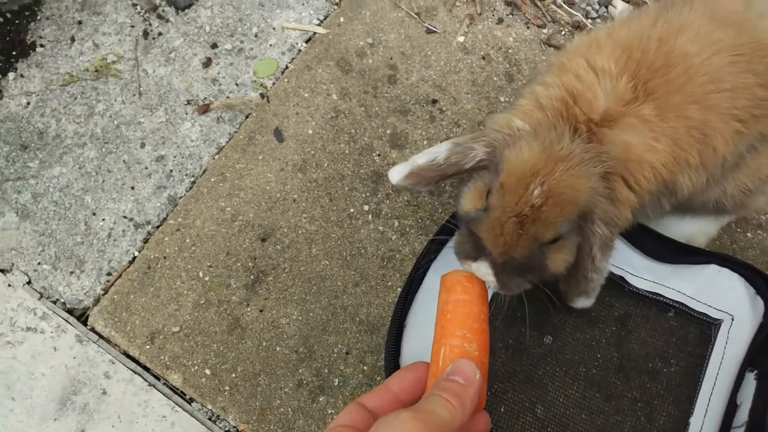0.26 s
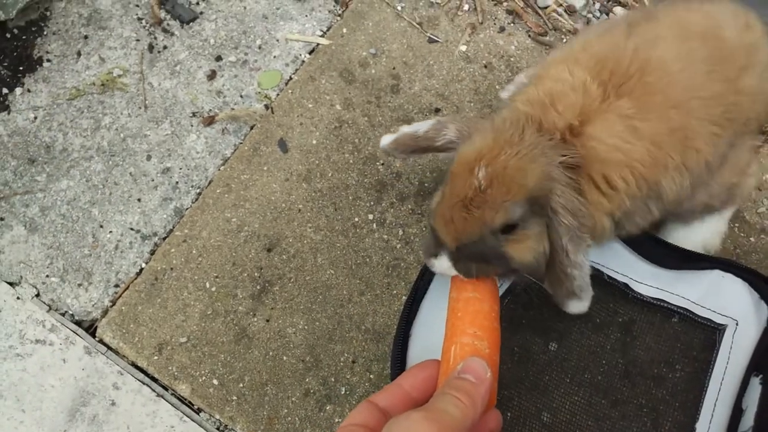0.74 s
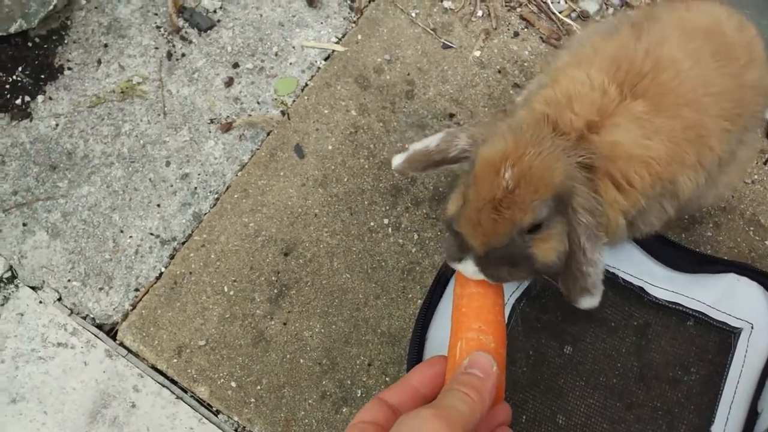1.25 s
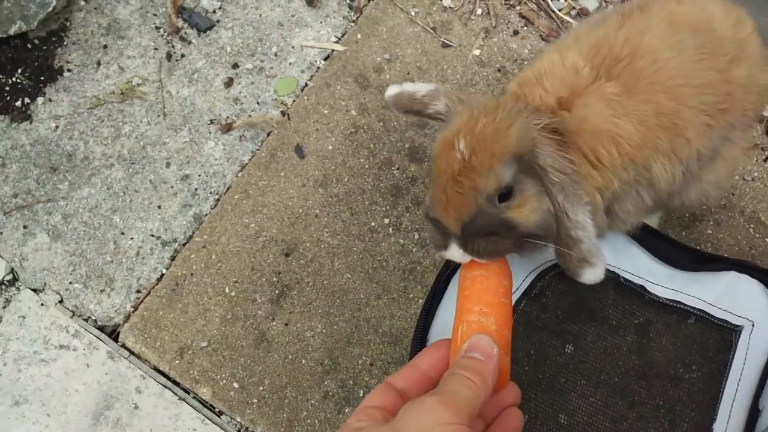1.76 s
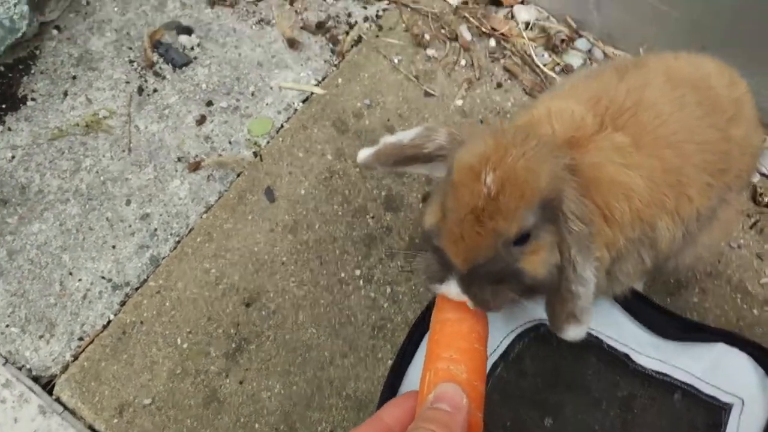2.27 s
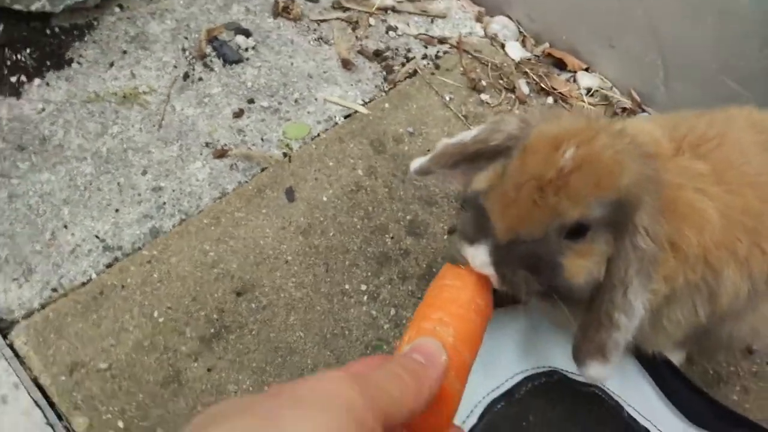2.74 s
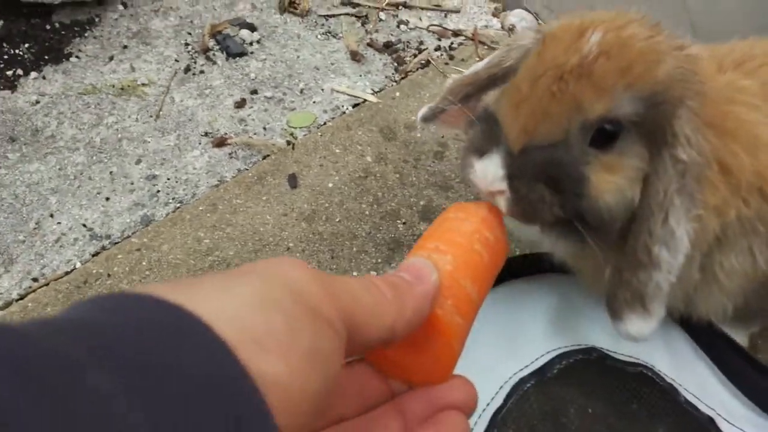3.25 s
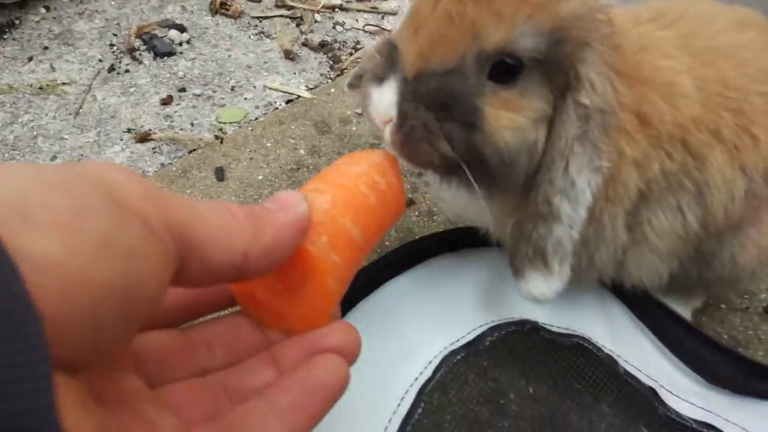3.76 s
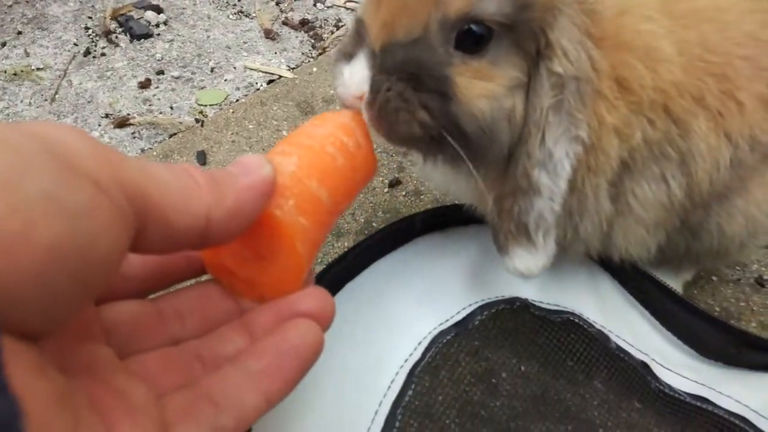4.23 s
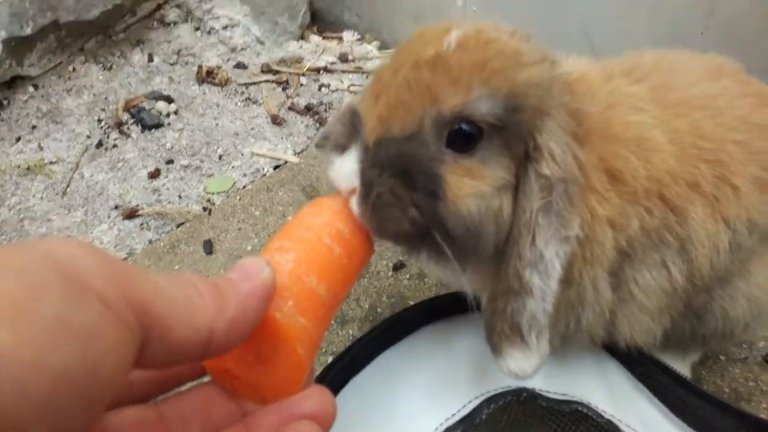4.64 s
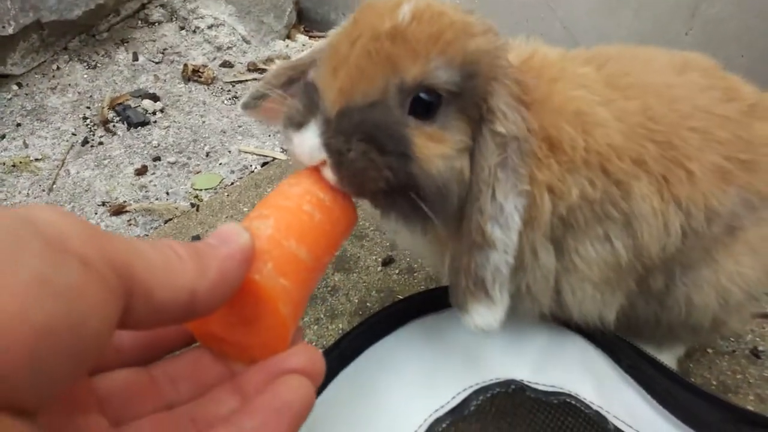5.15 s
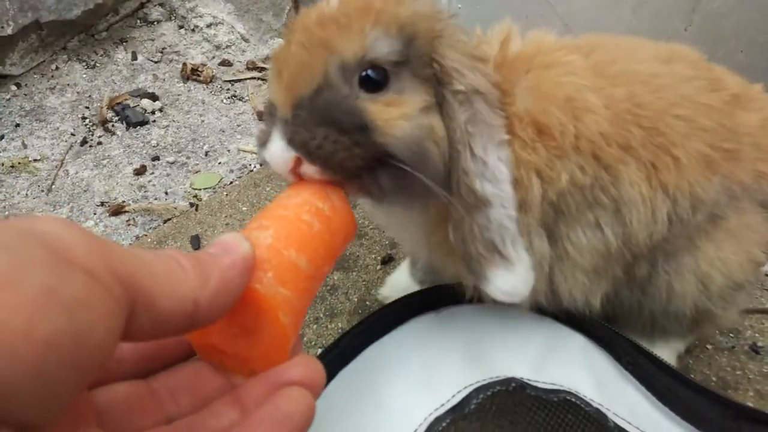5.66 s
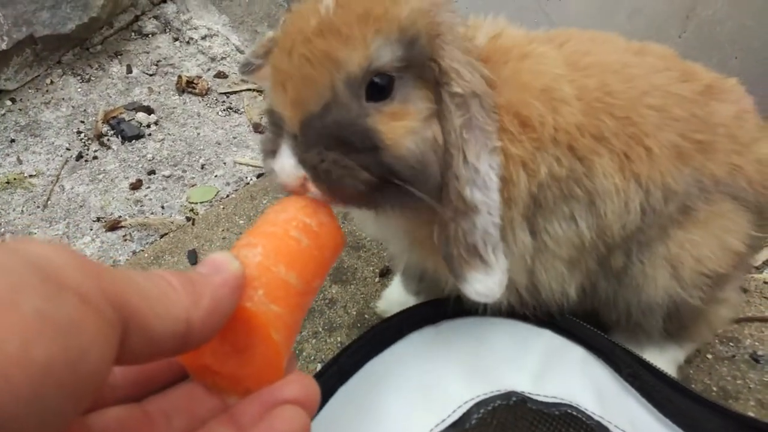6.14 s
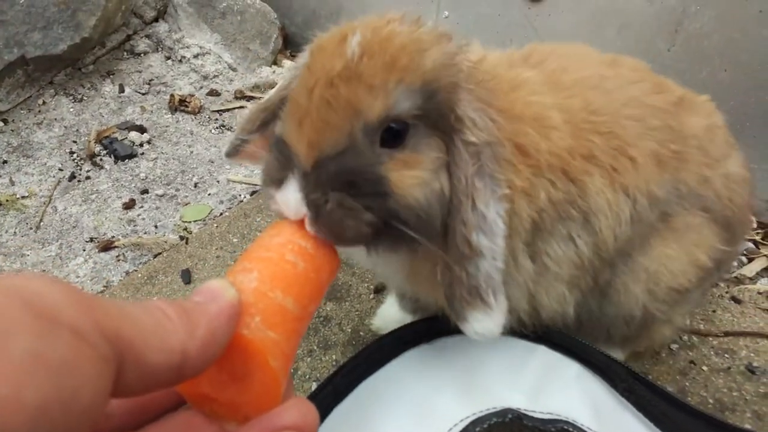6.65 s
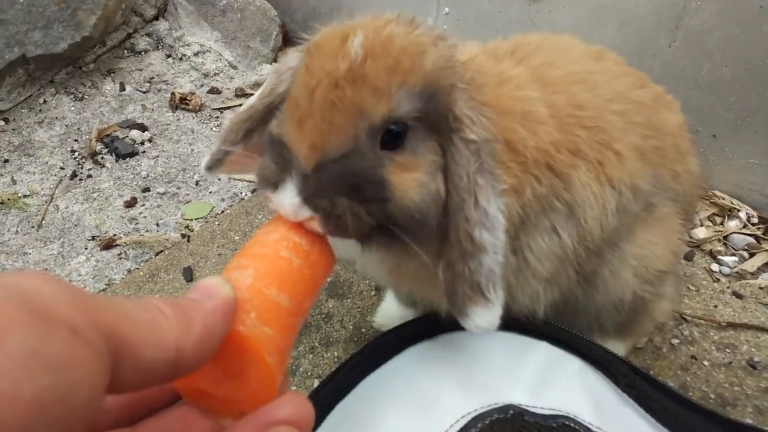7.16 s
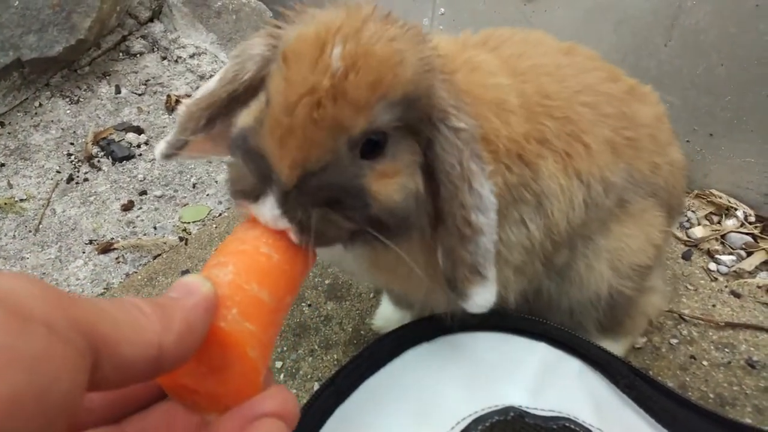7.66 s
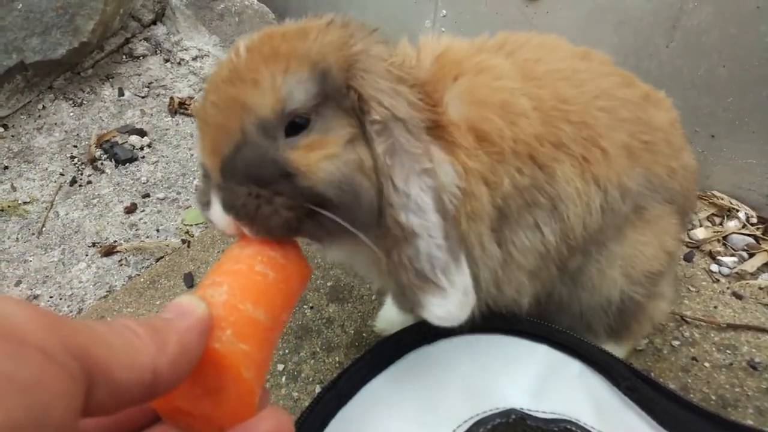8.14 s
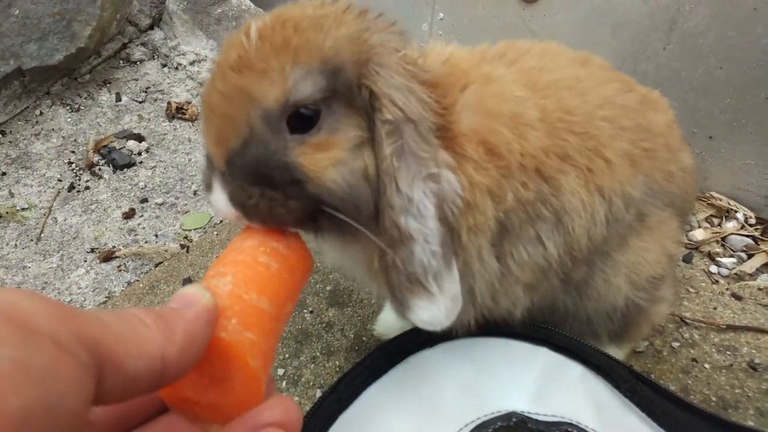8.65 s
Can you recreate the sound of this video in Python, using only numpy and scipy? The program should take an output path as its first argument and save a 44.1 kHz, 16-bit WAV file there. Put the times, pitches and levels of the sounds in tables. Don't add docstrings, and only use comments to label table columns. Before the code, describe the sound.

Quick dry gnawing and snapping carrot fibres over faint far traffic, interrupted by cloth rustle and loud stuttering handling rubs, thumps and pops on the left.

```python
import sys
import numpy as np
from scipy import signal
from scipy.io import wavfile
from scipy.ndimage import uniform_filter1d, minimum_filter1d

SR = 44100
rng = np.random.default_rng(int(sys.argv[2]) if len(sys.argv) > 2 else 0)


def volts_from_db(level):
    exponent = np.asarray(level, float) / 20
    return 10 ** exponent


def output_pcm(signal):
    pcm = np.clip(np.atleast_2d(signal).T, -1, 1) * 32767
    wavfile.write(sys.argv[1], SR, np.round(pcm).astype(np.int16))


N = 392490


def evened(x):
    return x / np.sqrt(np.mean(x ** 2) + 1e-20)


def read(points, hz):
    f, value = np.transpose(points)
    return np.interp(np.log(hz + 1), np.log(f + 1), value)


def along(rows, column, silent=-150):
    rows = np.array(rows)
    return np.interp(np.arange(N) / SR, rows[:, 0], rows[:, column], silent, silent)


def colour(x, db):
    mirrored = np.r_[db, db[-2:0:-1]]
    log_gain = np.log(volts_from_db(np.maximum(mirrored, -100)))
    taps = np.fft.ifft(np.exp(np.conj(signal.hilbert(log_gain)))).real
    return signal.oaconvolve(x, taps[:len(db)])[:len(x)]


def shaped(x, points):
    return colour(x, read(points, np.fft.rfftfreq(4096, 1 / SR)))


def passed(x, order, hz, kind):
    return signal.sosfilt(signal.butter(order, hz, kind, fs=SR, output="sos"), x)


def grains(per_s, spread_db):
    size = volts_from_db(spread_db * np.minimum(rng.exponential(1, N), 4))
    sign = rng.choice([-1., 1.], N)
    return evened(size * sign * (rng.random(N) < per_s / SR))


def clumps(depth_db, size):
    drift = uniform_filter1d(uniform_filter1d(rng.standard_normal(N), size), size)
    return evened(volts_from_db(depth_db * evened(drift)))


def bursts(rows, t60, rise=0.00049):
    out, t = np.zeros(N + 4000), np.arange(4000) / SR
    for s, db in rows:
        out[round(s * SR):][:4000] += volts_from_db(db - 60 * t / t60) * np.minimum(t / rise, 1)
    return out[:N]


def stretch(s, length, shape_db):
    out, t = np.zeros(N), np.arange(0, length, 1 / SR)
    out[round(s * SR):][:len(t)] = volts_from_db(shape_db(t))
    return out


# frequency in Hz, level in dB per Hz.
HUM_COLOUR = [(25, -41), (85, -28), (130, -20.5), (190, -3), (304, -5.5), (854, -14.5), (1120, -18),
              (2900, -23), (3810, -24.5), (6730, -24.5), (8600, -33), (16500, -40.5)]
HUM_DB = -64
# time in seconds, level in dB.
HUM_SWELL = [(0, 1), (1, 1), (2.4, 0.4), (3.2, 3.5), (4.1, 2), (6, 1.5), (8.9, 1)]
# frequency in Hz, likeness from -1 to 1.
LIKENESS = [(60, 0.31), (180, 1), (550, 0.67), (1650, -0.08), (4970, -0.022), (15000, -0.22)]
# frequency in Hz, level in dB.
HUM_RIGHT = [(100, 1), (640, 2), (2000, 0), (7000, -7), (15000, -2)]


def hum():
    frames, hz = N // 256 + 5, np.fft.rfftfreq(1024, 1 / SR)
    a, b, c, d, patches = rng.standard_normal((frames, 513, 5)).T
    patches_db = evened(uniform_filter1d(uniform_filter1d(patches, size=10, axis=0), size=12, axis=1))
    s, db = np.transpose(HUM_SWELL)
    swell_db = np.interp(np.arange(frames) * 256 / SR, s, db - db[0])
    swell_db = swell_db / (1 + (hz[:, None] / 1200) ** 2)
    same = np.clip(read(LIKENESS, hz), -1, 1)[:, None]
    left, other = a + 1j * b, c + 1j * d
    right = (same * left + np.sqrt(1 - same ** 2) * other) * volts_from_db(read(HUM_RIGHT, hz))[:, None]
    spectra = np.array([left, right]) * volts_from_db(read(HUM_COLOUR, hz)[:, None] + patches_db + swell_db)
    return volts_from_db(HUM_DB) * evened(signal.istft(spectra, nperseg=1024, noverlap=768)[1][:, :N])


# frequency in Hz, level in dB.
SELF_NOISE = [(150, -45), (1000, -10.5), (4000, -4.5), (10000, -1), (16500, 1)]
SELF_DB = -73


def self_noise():
    return np.array([volts_from_db(SELF_DB) * evened(shaped(rng.standard_normal(N), SELF_NOISE)) for port in range(2)])


# time in seconds, cover of the left port from 0 to 1, left-right balance of the rabbit in dB.
GRIP = [
    (0, 0, -16),
    (1.0, 0, 10),
    (2.4, 0, 2),
    (3.1, 0.1, 15),
    (3.8, 1, 3),
    (8.9, 1, 19),
]
# frequency in Hz, width in Hz, boost in dB.
OPEN_PORT = [(2660, 680, 7.5), (7800, 1800, 9.5)]
COVERED_PORT = [(2524, 220, 7.6), (3780, 570, 12.55), (4298, 740, 11.8), (7170, 1100, 9.4),
                (8880, 450, 9.3), (14900, 3400, 11.2)]


def left_port(x, depth, hiss_db=0):
    hz = np.fft.rfftfreq(512, 1 / SR)
    open_db, covered_db = [sum(db / (1 + (2 * (hz - f) / width) ** 2) for f, width, db in port)
                           for port in (OPEN_PORT, COVERED_PORT)]
    cover = np.clip(along(GRIP, 1), 0, 1)
    free_db = depth * open_db + hiss_db / (1 + ((hz - 7000) / 1500) ** 2)
    shut_db = depth * covered_db / (1 + (1 - depth) * (hz / 6000) ** 4)
    return (1 - cover) * colour(x, free_db) + cover * colour(x, shut_db)


# start in seconds, length in
# seconds, level in dB, fizz above 11 kHz in dB.
GRINDS = [
    (0.985, 0.089, -79, 19),
    (1.424, 0.027, -60, -14),
    (1.486, 0.013, -74.5, 15),
    (1.675, 0.11, -67.5, -17),
    (1.808, 0.077, -74, 10.5),
    (2, 0.055, -61.5, -20),
    (2.07, 0.098, -68, -9),
          (3.984, 0.092, -71.5, -14), (4.768, 0.05, -64.5, -11), (4.949, 0.093, -62.5, -19),
         (5.05, 0.057, -84, -17), (5.147, 0.083, -78.5, 6), (5.221, 0.032, -65, -2),
         (5.419, 0.066, -67, -29), (5.566, 0.063, -66.5, -12.5), (5.745, 0.052, -57.5, -7),
         (5.798, 0.051, -72, -6), (6.01, 0.06, -67.5, -30), (6.067, 0.044, -69, -10),
         (6.242, 0.098, -72, -3), (6.444, 0.0095, -51.5, -18), (6.344, 0.0073, -82.5, 21),
         (6.454, 0.078, -70.5, -13), (6.65, 0.087, -72, -8), (6.852, 0.06, -74.5, 10),
         (6.899, 0.022, -69.5, 10), (7.058, 0.075, -74.5, -5), (7.273, 0.056, -59.5, -21),
         (7.326, 0.039, -65, -8), (7.481, 0.076, -65.5, -19), (7.633, 0.055, -71, 10.5),
         (7.86, 0.051, -63, -22), (8.072, 0.072, -64, -8.5), (8.392, 0.022, -60, -16),
         (8.402, 0.078, -67, -12), (8.521, 0.017, -74.5, 5), (8.707, 0.08, -77.5, 11)]
STROKE_EDGE_S, STROKE_SAG_DB = 0.0072, -1.5


def strokes(fizz):
    out = np.zeros(N)
    for s, length, db, fizz_db in GRINDS:
        n = round((length + STROKE_EDGE_S) * SR)
        ease_db = STROKE_SAG_DB * np.linspace(-.5, .5, n)
        ends = signal.windows.tukey(n, min(2 * STROKE_EDGE_S * SR / n, 1))
        out[round(s * SR):][:n] += volts_from_db(db + ease_db + fizz * fizz_db) * ends
    return out


def bands(x):
    edges = [(5500, "low"), ((5500, 11000), "band"), (11000, "high")]
    return [evened(passed(row, 3, hz, kind)) for row, (hz, kind) in zip(x, edges)]


# time in seconds, peak in dB, fizz above 11 kHz in dB.
FIBRE_SNAPS = [(0.7404, -38, 15), (0.7467, -36.5, 21), (0.7546, -31.5, 12.5), (1.4351, -45, 1),
               (1.448, -20.5, -6), (1.744, -38.5, 7), (1.77, -33, -6), (1.784, -28.5, -6), (1.809, -34.5, 3),
               (1.8662, -39, -12), (2.0128, -30, -23), (2.0298, -34, -17), (2.0564, -27, -10),
               (2.121, -49, 17),
               (5.0245, -35, 1), (5.0566, -19, -1), (5.0606, -33, -18), (5.0623, -38, 25), (5.064, -51, 5),
         (5.032, -40, 8), (5.096, -53, 10), (5.0702, -29, 7), (5.1973, -21.5, 6), (5.272, -29.5, -4.5),
         (5.6159, -27.5, -9), (5.7603, -26, -16), (5.8113, -26, 11.5), (5.8463, -28, 1),
         (6.0475, -24.5, -17), (6.057, -24.5, -21), (6.573, -33, 2), (6.755, -54, 14), (6.9132, -34, -1),
         (7.077, -31.5, -15), (7.1523, -65, 40.5), (7.293, -39, -15), (7.2946, -29, -6),
         (7.4982, -29.5, -14), (7.5471, -30, 1), (7.611, -18.5, -7), (7.9025, -39, -6), (8.1555, -27.5, 3),
         (8.1637, -29, 7.5), (8.191, -38, 13), (8.406, -36, -25), (8.4347, -28.5, -15), (8.4647, -27, -12),
         (4.6914, -33, -23), (4.7866, -37, -14.5), (4.9644, -36, -9), (5.006, -36, -4), (5.5828, -46, -12),
         (6.029, -27, -22), (6.2493, -44, -12), (6.2663, -42, -4), (6.8584, -36, -3), (6.8922, -37, 2),
         (7.281, -48, -17), (7.3484, -38, -6), (7.682, -43, 2), (7.875, -28.5, -20), (8.0894, -31, -14),
         (8.0936, -31, -11), (8.103, -32, -16), (8.38, -40, -11)]
# frequency in Hz, level in dB.
BITE = [(120, -106), (400, -44), (1100, 0.5), (2000, -1), (3000, 0), (6000, -11.5), (10000, -14),
        (16500, -10)]
# start in seconds, length in seconds, level in dB.
MUNCHES = [
    (2.03, 0.06, -76),
    (4.764, 0.039, -75),
    (5.572, 0.068, -70),
    (5.75, 0.083, -70),
    (6.049, 0.008, -51.5),
    (6.23, 0.088, -66.5),
    (8.1, 0.066, -75),
]
SNAP_T60, SNAP_CORE_S, SNAP_CORE_DB = 0.0069, 0.0014, 17
CRUMBS_DB, CRUMBS_T60 = -35.5, 0.051
SMALL_SNAPS_PER_S, SMALL_SNAP_DB = 15, 16


def rabbit():
    s, db, fizz_db = np.transpose(FIBRE_SNAPS)
    thin_starts = 1. * (rng.random(N) < SMALL_SNAPS_PER_S / SR)
    thin_snap = bursts([(0.0071, SMALL_SNAP_DB)], SNAP_T60, rise=0.0035)[:2000]
    thin = signal.oaconvolve(thin_starts, thin_snap)[:N]
    grind, snap = [], []
    # how far it follows the fizz, trim of the grinding and of the snaps in dB
    for share, grind_db, snap_db in [(0.2, -0.87, -6), (0.5552, 0, -4), (0.91, 0.12, 3)]:
        effort = strokes(share)
        crumbs = bursts(zip(s, db + CRUMBS_DB + share * fizz_db), CRUMBS_T60)
        grind.append((effort + crumbs) * clumps(2.7, size=150) * volts_from_db(grind_db))
        cracks = bursts(zip(s, db + share * fizz_db), SNAP_T60, rise=0.0051)
        snap.append((cracks + thin * effort) * volts_from_db(snap_db))

    cells, fibres = [grains(2500, 3.1) for band in range(3)], grains(26000, 2.5)
    fibres[np.round((s + SNAP_CORE_S) * SR).astype(int)] = volts_from_db(SNAP_CORE_DB)
    jaw = sum(stretch(start, length, lambda t: level - 12 * (1 - np.sin(np.pi * t / length)))
              for start, length, level in MUNCHES)
    dull = jaw * evened(passed(cells[0], 2, (900, 2100), "band"))

    ports = []
    for side in range(2):
        crackle = bands([shaped(0.16 * c + 2.0 * grains(2500, 2.5), BITE) for c in cells])
        crack = bands([shaped(0.64 * fibres + 0.5 * rng.standard_normal(N), BITE)] * 3)
        ports.append(dull + sum(g * a + n * b for g, a, n, b in zip(grind, crackle, snap, crack)))
    right = np.roll(ports[1], shift=26) * volts_from_db(4.0 - along(GRIP, 2, 0))
    return np.array([ports[0], right])


# start in seconds, length in seconds, level in dB.
TREMBLES = [
    (3.72, 0.051, -51),
    (4.575, 0.052, -45),
]
DABS_PER_S = 125
# time in seconds, peak in dB.
DABS = [(2.119, -56.5), (2.835, -51), (3.05, -43), (3.758, -49), (3.778, -36), (3.821, -42), (3.84, -41),
        (3.875, -51), (3.896, -42), (3.915, -44), (4.01, -48.5), (4.513, -42), (4.524, -47), (4.538, -40.5),
        (4.552, -39.5), (4.649, -38), (4.66, -41), (5.013, -48), (5.201, -39.5)]
# frequency in Hz, width in Hz, level in dB.
CASE_MODES = [(315, 180, -5), (487, 155, -2), (950, 450, -11.5), (3060, 2500, -23)]


def dabs():
    shakes = [(t + rng.uniform(0, 0.0012), db + 1.6 * rng.standard_normal())
              for s, length, db in TREMBLES for t in np.arange(s, s + length, 1 / DABS_PER_S)]
    s, db = np.transpose(DABS + shakes)
    hz = np.fft.rfftfreq(4096, 1 / SR)
    case_power = sum(volts_from_db(2 * d) / (1 + (2 * (hz - f) / width) ** 2) ** 2 for f, width, d in CASE_MODES)
    skin = grains(5100, 3.7)
    skin[np.round((s + 0.0004) * SR).astype(int)] = 6
    pushes = bursts(zip(s, db + 22), 0.021, rise=0.00029) * skin
    return colour(pushes, 10 * np.log10(case_power))


# start in seconds, length in seconds, left level in dB, right level in dB.
FOLDS = [(2.39, 0.23, -65.5, -73), (2.44, 0.019, -65, -85), (2.483, 0.017, -65, -85),
         (2.5, 0.031, -67, -85), (2.559, 0.022, -60, -85), (2.584, 0.19, -53, -85),
         (2.759, 0.016, -54.5, -85), (2.766, 0.16, -53.5, -65), (2.887, 0.22, -47, -57.5),
         (3.003, 0.12, -70, -61), (3.063, 0.12, -40.5, -75), (3.41, 0.21, -73, -71),
         (3.597, 0.47, -67, -90)]
# frequency in Hz, level in dB.
CLOTH = [
    [(120, -41.5), (300, 0), (1800, -7), (4300, -8.5), (5200, -1.5), (10300, -4.5), (11500, -9.5),
     (16500, -17.5)],
    [(200, -42), (1500, -25), (3000, -7), (6000, -7), (10000, -6), (16500, -0.5)],
]
FOLD_ENDS_DB, FOLD_LEAN = -10.5, 0.96


def sleeve():
    rucks = clumps(0.82, size=300)
    levels = [0, 0]
    for s, length, *port_db in FOLDS:
        arch = stretch(s, length, lambda t: FOLD_ENDS_DB * (1 - np.sin(np.pi * (t / length) ** FOLD_LEAN)))
        levels = [level + arch * volts_from_db(db) for level, db in zip(levels, port_db)]
    return np.array([level * evened(shaped(grains(14000, 3.5) * rucks, tone))
                     for level, tone in zip(levels, CLOTH)])


# time in seconds, pressure in dB.
PRESS = [
    (3.06, -60.5),
    (3.158, -31.5),
    (3.198, -29.5),
    (3.212, -27.5),
    (3.236, -27.5),
    (3.252, -26),
    (3.272, -32),
    (3.297, -31.5),
    (3.308, -99),
]
PRESS_HISS_DB, HISS_FOLLOWS = -45.5, 0.4
# start in seconds, length in seconds, level in dB, slackening in dB, hiss in dB.
SLIPS = [
    (3.3132, 0.096, -28.5, -10, -44),
    (3.4111, 0.014, -28, 5, -46),
    (3.441, 0.063, -26.5, -22, -49.5),
    (3.4945, 0.061, -27.5, -22, -45.5),
    (3.5619, 0.028, -29.5, -19.5, -51),
    (3.59, 0.039, -33, -28, -52),
    (3.623, 0.016, -51, 4, -44),
    (3.638, 0.063, -44.5, -14, -47.5),
    (3.691, 0.013, -37.5, -18, -44),
]
STICK_S, STICK_DB = 0.0088, -20


def sliding():
    press_db = along(PRESS, 1)
    push = volts_from_db(press_db)
    hiss = volts_from_db(PRESS_HISS_DB + HISS_FOLLOWS * (press_db + 38)) * (press_db > -99)
    for s, length, db, slack_db, hiss_db in SLIPS:
        grip = stretch(s, length, lambda t: STICK_DB * np.clip(1 - (length - t) / STICK_S, 0, 1))
        push += grip * stretch(s, length, lambda t: db + slack_db * t / length)
        hiss += grip * stretch(s, length, lambda t: hiss_db + HISS_FOLLOWS * slack_db * (t / length - .5))
    return push, hiss


def knocks(rows, t60, rise):
    out, t = np.zeros(N), np.arange(2000) / SR
    for s, db, hz in rows:
        envelope = volts_from_db(db - 60 * t / t60) * np.minimum(t / rise, 1)
        out[round(s * SR):][:2000] += envelope * np.sin(2 * np.pi * hz * t)
    return out


# frequency in Hz, level in dB per Hz.
SKIN_RUMBLE = [(59, -72), (100, -6), (208, -0.5), (367, -3), (555, -5), (621, -2.5), (682, -8), (750, -5.5),
               (1420, -9.5), (1590, -12), (2230, -14.5), (9000, -46.5), (11700, -43), (19800, -120)]
# frequency in Hz, level in dB.
SKIN_HISS = [(300, -37), (1800, 5.5), (2900, 2.5), (4000, 5.5), (5000, -1), (7000, -2.5), (10000, -11.5),
             (14500, -8.5), (16500, -8)]
# frequency in Hz, level in dB.
THUMP = [(20, 0), (70, -6), (110, -1), (200, -40), (20000, -99)]
# time in seconds, peak in dB, crackle in dB.
POPS = [(3.2097, -36, -30), (3.3112, -17.5, -32), (3.343, -41, -18), (3.361, -16, -18), (3.413, -27, -32),
        (3.441, -24, -16), (3.492, -24, -8), (3.5615, -27.5, -27), (3.591, -23, -19), (3.6074, -27, -11),
        (3.6384, -22.5, 1), (3.6907, -29, -16), (3.795, -33, 2), (3.851, -25.5, 2.5), (3.855, -35.5, 3),
        (4.232, -18, -7), (4.2372, -27, -8), (4.4676, -18.5, 1), (4.472, -28.5, -3), (4.4938, -21.5, -4),
        (4.4962, -28.5, -2), (4.477, -35, 0), (4.5612, -22, -4.5), (4.578, -44, -4), (4.633, -25, -9),
        (4.668, -24.5, -4.5), (5.2089, -19.5, -7), (6.121, -23, -4.5), (6.1221, -35, -6),
        (6.448, -22, -10.5), (6.847, -46.5, -7), (7.557, -48, -12), (7.601, -26.5, -14), (7.603, -43.5, 7)]
# time in seconds, peak in dB.
TICKS = [(3.485, -29), (3.5792, -24), (3.6274, -26), (3.6305, -24), (3.634, -27), (3.6762, -21),
         (3.679, -23), (3.6815, -24.5), (3.6845, -25), (3.692, -41), (3.7795, -17), (3.8248, -44),
         (3.8565, -38), (3.8674, -47), (3.9196, -42), (3.9614, -33.5), (4.001, -47), (4.5064, -31.5),
         (4.553, -43)]
# time in seconds, peak in dB, pitch in Hz.
KNOCKS = [
    (3.1595, -11, 566),
    (3.1705, -13, 520),
    (3.2035, -10, 620),
    (3.2085, -3.5, 673),
    (3.217, -8.5, 592),
    (3.2465, -31, 565),
    (3.294, -14, 496),
]
# time in seconds, peak in dB, pitch in Hz.
JOLTS = [(3.3123, -23, 600), (3.4133, -21, 700), (3.4421, -21, 520), (3.49415, -22, 806), (3.5623, -7, 710),
         (3.5919, -17, 586), (3.6395, -11, 820), (3.69105, -26.5, 700)]
# time in seconds, peak in dB, pitch in Hz.
PINGS = [
    (3.7799, -16.5, 3850),
    (5.0572, -21, 3770),
    (3.78, -21, 7400),
    (3.7801, -21.5, 9100),
]


def finger():
    push, hiss = sliding()
    rumble = push * volts_from_db(7.5) * evened(shaped(grains(4500, 1.4) * clumps(1.57, size=90), SKIN_RUMBLE))
    s, db, crackle_db = np.transpose(POPS)
    hiss = hiss + bursts(zip(s + 0.0019, db + crackle_db), 0.0057)
    skin = evened(shaped(grains(6000, 2.5) * clumps(0.88, size=120), SKIN_HISS))
    ticks = bursts(TICKS, 0.007) * passed(skin, 4, 4100, "high")

    drops = np.zeros(N)
    drops[np.round((s + 0.001) * SR).astype(int)] = -volts_from_db(db + 9.5)
    drops[np.round((s + 0.0017) * SR).astype(int)] = -volts_from_db(db - 38.0)
    drop_colour = [(700, -3.0), (1300, -7.5), (2200, -4.0), (4500, -3.5), (7000, -16.5), (16000, -13)]  # (Hz, dB)
    steps = signal.lfilter([1], [1, -0.995], shaped(drops, drop_colour))

    rings = knocks(KNOCKS, t60=0.019, rise=0.0014)
    rings += knocks(JOLTS, t60=0.0065, rise=0.00035)
    rings += knocks(PINGS, t60=0.0049, rise=0.00023)
    pressure = passed(passed(steps + rumble + dabs(), 4, 165, "high"), 4, 225, "high")
    pressure += passed(rings, 2, 130, "high")

    slipping = np.arange(N) > SLIPS[0][0] * SR
    thump = volts_from_db(-26) * push * slipping * evened(shaped(grains(350, 3.4), THUMP))
    return hiss * skin + ticks + pressure + volts_from_db(-46) * steps + thump


def scene():
    far, near, cloth = hum(), rabbit(), sleeve()
    left = left_port(far[0], depth=0.54, hiss_db=3.5) + left_port(near[0], depth=1.0) + cloth[0] + finger()
    right = far[1] + near[1] + cloth[1]
    return np.array([left, right]) + self_noise()


def dropped(x, size, rule):
    hz, t, z = signal.stft(x, SR, "cosine", nperseg=size, noverlap=size // 2)
    gone = rule(hz, np.minimum(np.round(t * SR).astype(int), N - 1), abs(z) ** 2)
    return signal.istft(z * ~gone, SR, "cosine", nperseg=size, noverlap=size // 2)[1][:, :N]


# frequency in Hz, level in dB.
WEAK = [(2500, -9), (5000, -4.6), (9000, -4), (16000, -4.2)]
# frequency in Hz, level in dB.
MASKED = [(1500, -80), (3000, -58), (6000, -53), (16000, -53)]
MASK_SPREAD_DB = 6
STEADY_CREST = 3.5


def thinned(x):
    edge = np.diff(x, prepend=0) ** 2
    peak = -minimum_filter1d(-uniform_filter1d(edge, size=128), size=2048)
    steady = peak < STEADY_CREST * uniform_filter1d(edge, size=2048)

    def strips(hz, at, power):
        both = power.mean(0)
        thin = minimum_filter1d(uniform_filter1d(both, size=6, axis=0), size=5, axis=0)
        thin = minimum_filter1d(thin, size=3, axis=1)
        weak = thin < volts_from_db(2 * read(WEAK, hz))[:, None] * uniform_filter1d(both, size=64, axis=0)
        return weak & steady[:, None, at]

    def patches(hz, at, power):
        cells = uniform_filter1d(power, size=5, axis=1)
        loudest = -minimum_filter1d(-cells.max(1), size=12)[:, None]
        whim = rng.standard_normal((len(at) // 2 + 1, len(hz) // 5 + 1))
        whim = whim.repeat(2, axis=0).repeat(5, axis=1)[:len(at), :len(hz)].T
        limit_db = read(MASKED, hz)[:, None] + MASK_SPREAD_DB * whim
        return (cells < volts_from_db(2 * limit_db) * loudest) & ~steady[:, None, at]

    return dropped(dropped(x, size=2048, rule=strips), size=256, rule=patches)


def band_limit(x):
    return signal.sosfilt(signal.butter(12, 16600, fs=SR, output="sos"), x)


def record(dry):
    low_pass = signal.firwin(511, 15950, window=("kaiser", 7), fs=SR)
    limited = signal.oaconvolve(dry, low_pass[None], "same")
    return band_limit(thinned(limited))


dry = scene()
out = record(dry)
output_pcm(out)
```